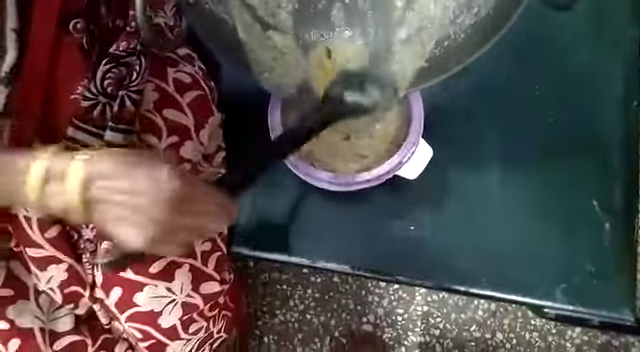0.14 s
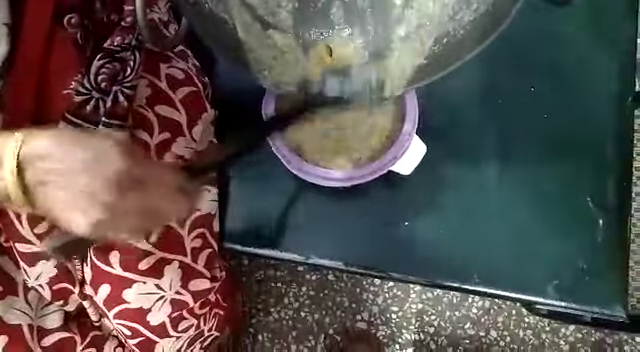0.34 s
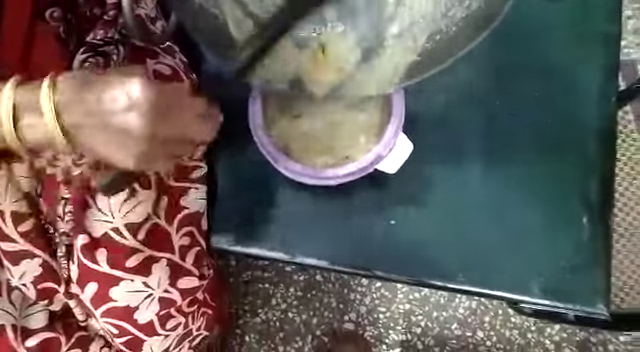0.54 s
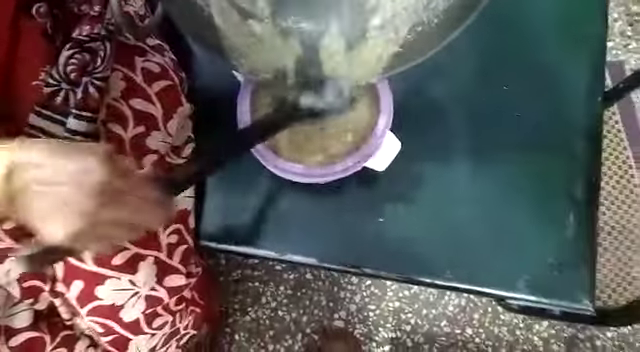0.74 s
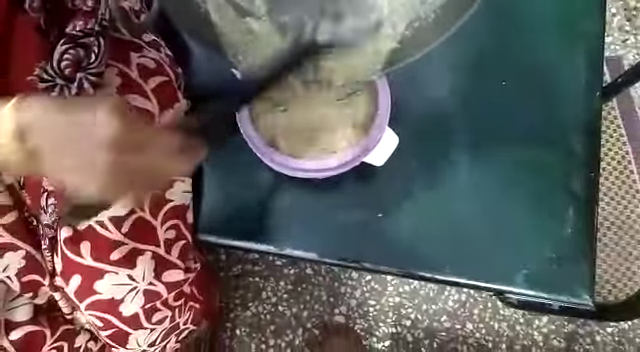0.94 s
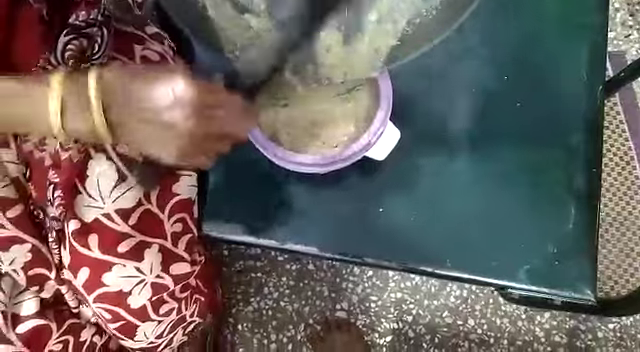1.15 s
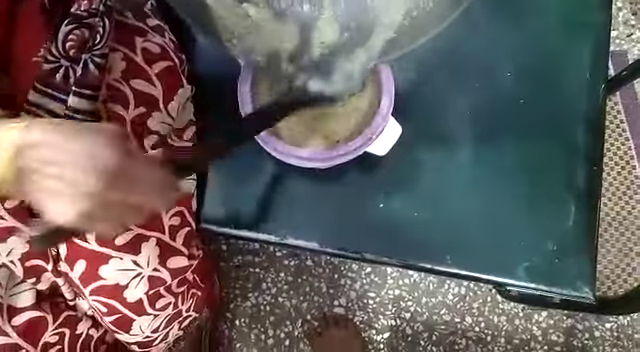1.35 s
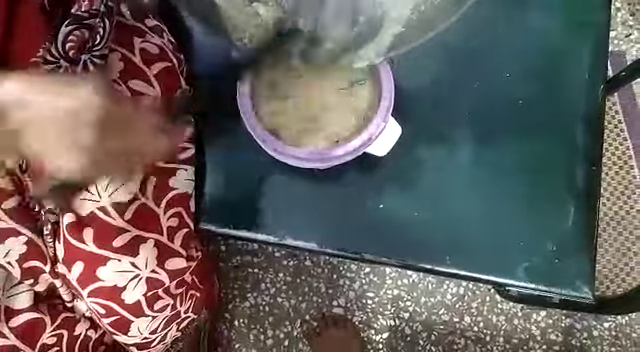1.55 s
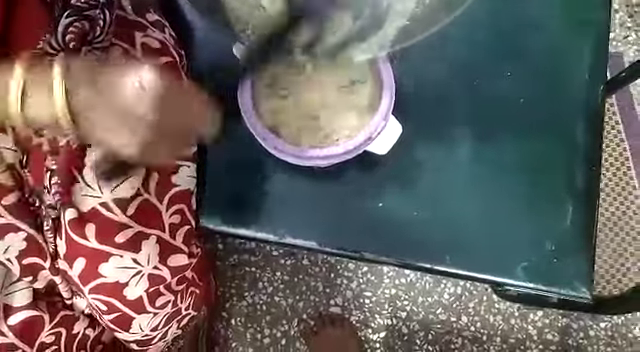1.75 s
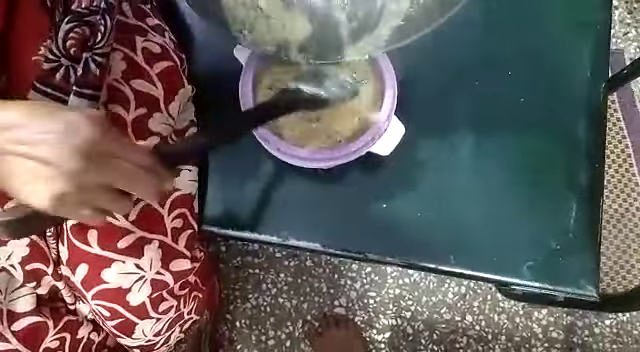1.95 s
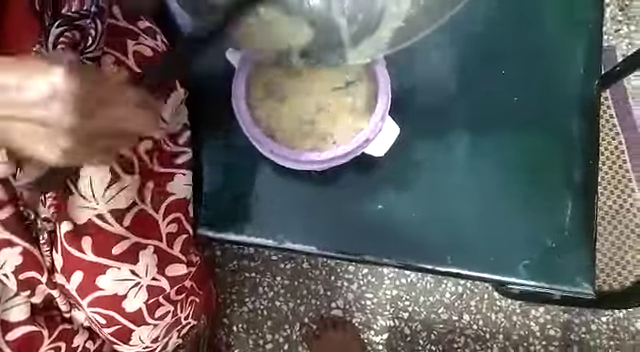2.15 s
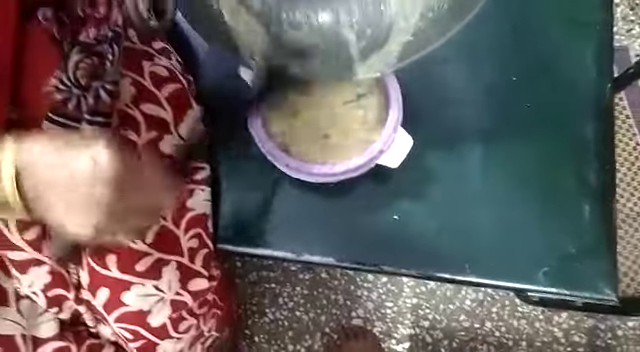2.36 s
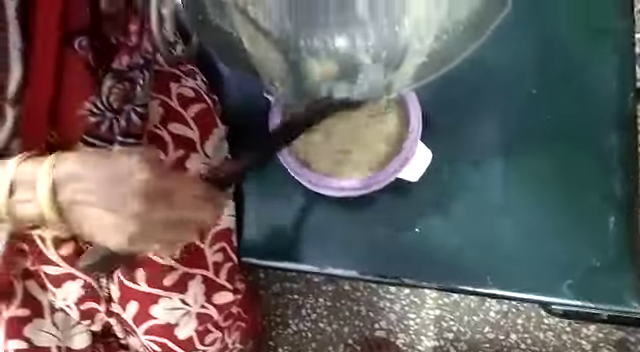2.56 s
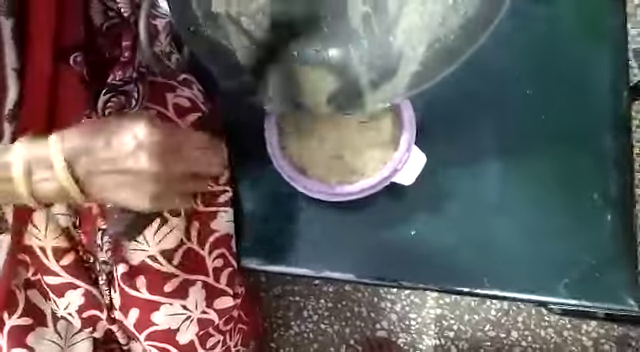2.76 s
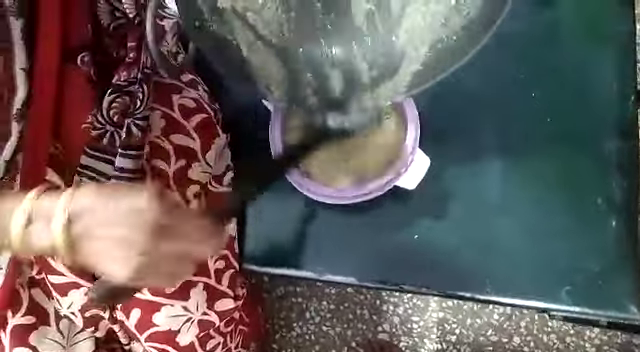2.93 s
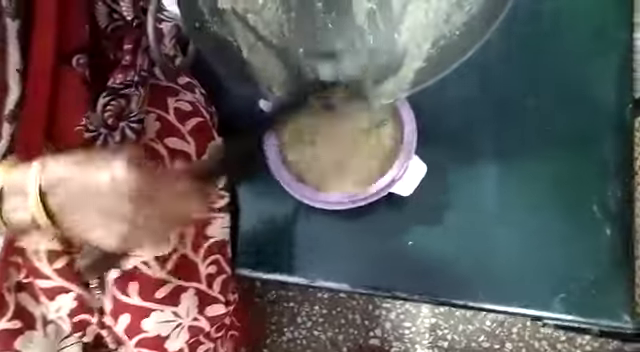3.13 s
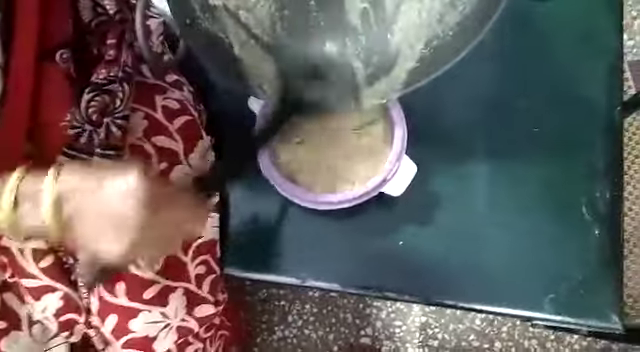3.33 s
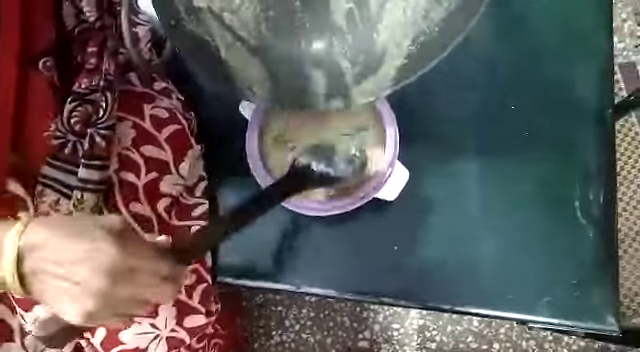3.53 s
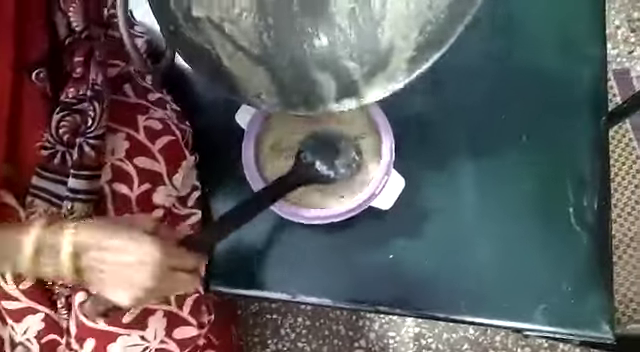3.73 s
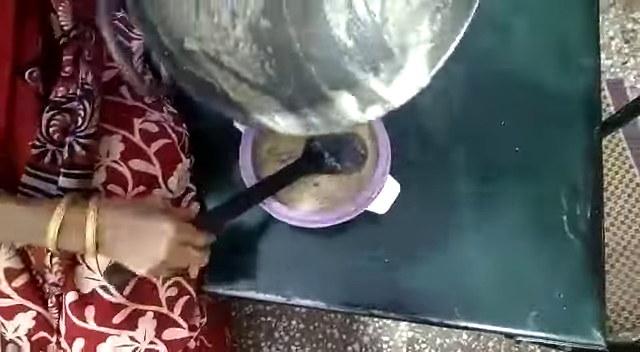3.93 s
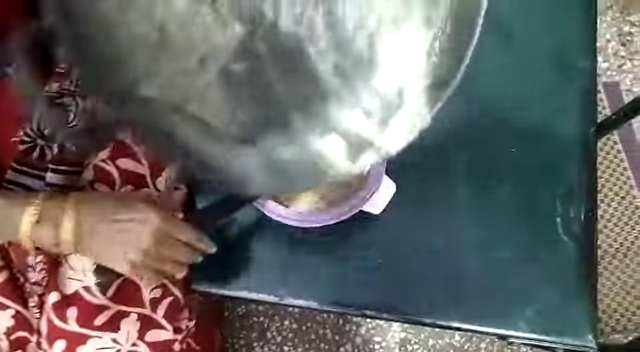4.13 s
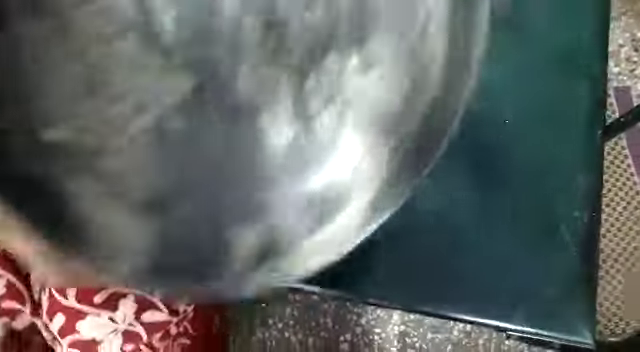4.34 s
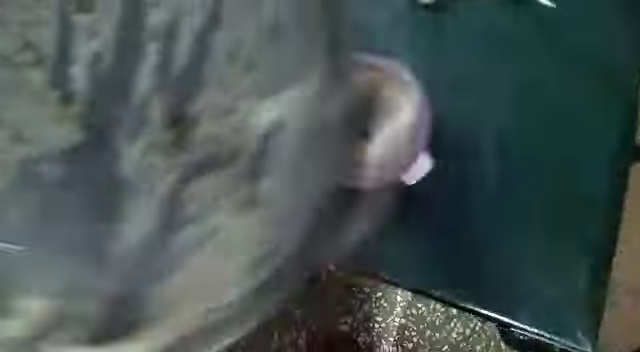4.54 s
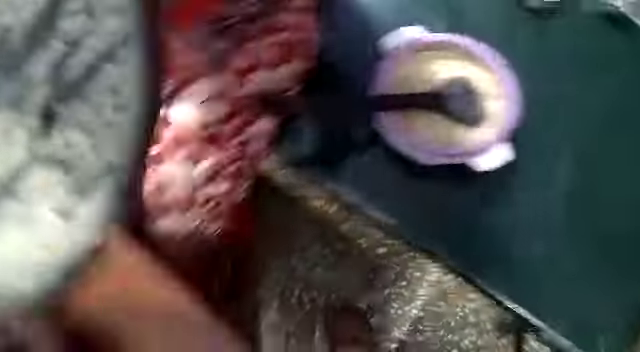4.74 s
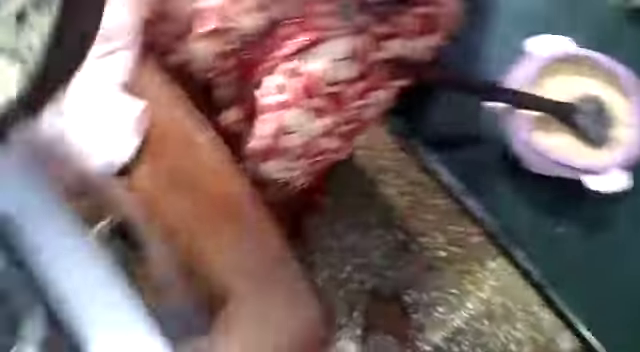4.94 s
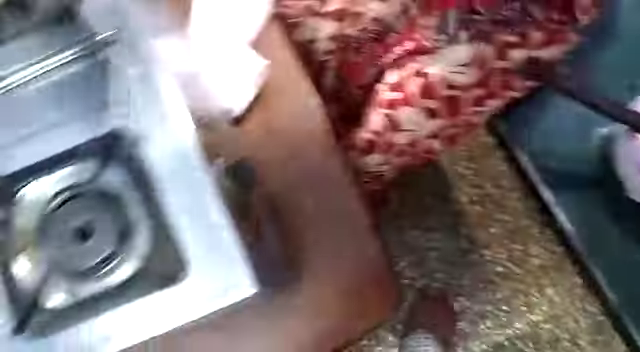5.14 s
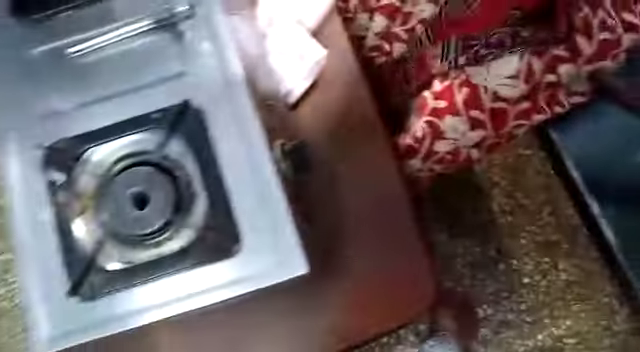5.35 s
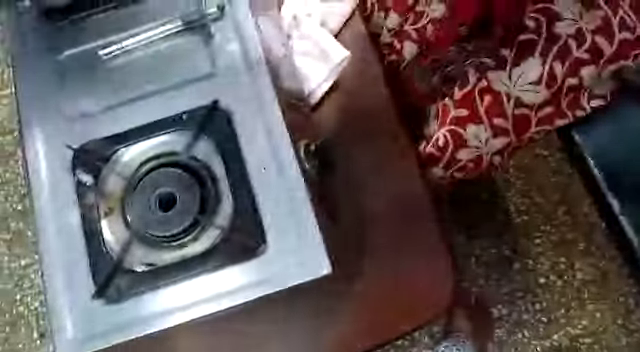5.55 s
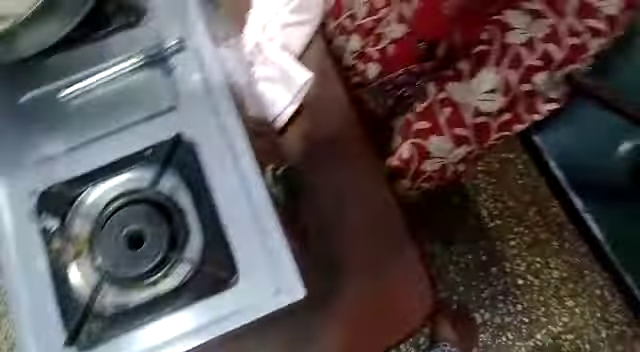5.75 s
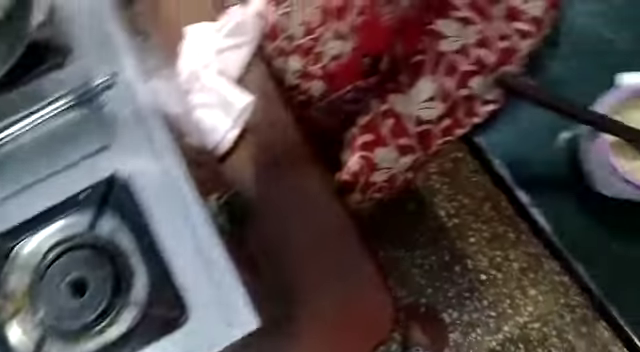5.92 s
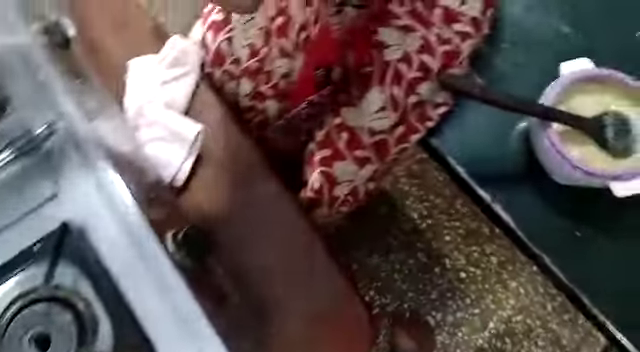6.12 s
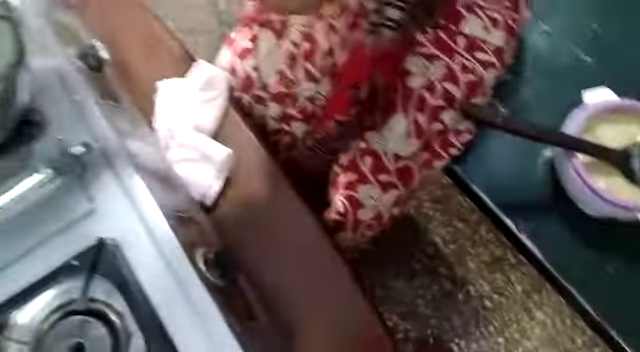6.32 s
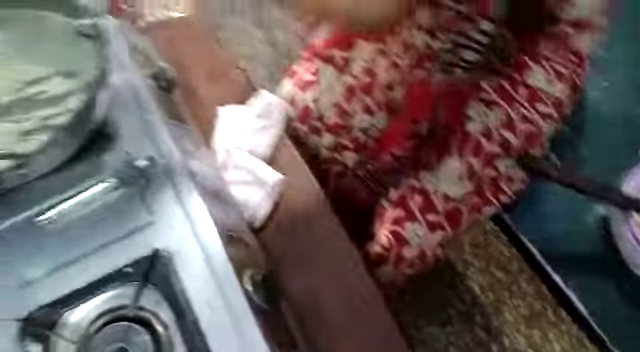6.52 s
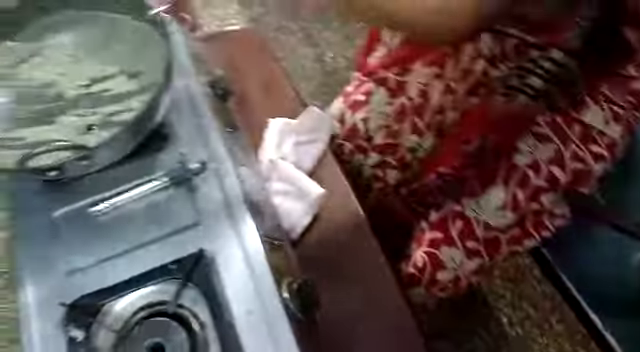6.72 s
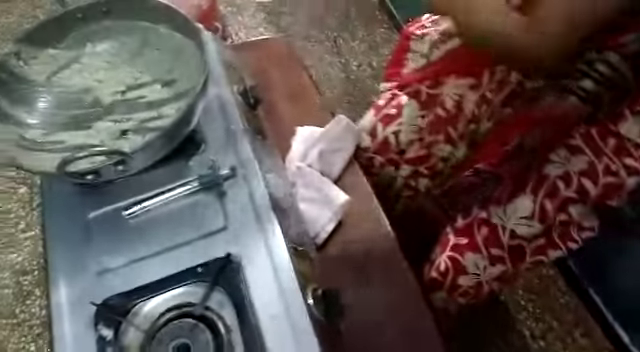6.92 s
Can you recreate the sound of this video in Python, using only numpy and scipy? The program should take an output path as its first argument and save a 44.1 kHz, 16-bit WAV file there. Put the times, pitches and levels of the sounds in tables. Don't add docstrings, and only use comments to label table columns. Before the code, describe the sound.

A metal ladle bangs and scrapes thick curry down a hand-held pan, then the pan clatters and grinds onto a stove grate.

```python
import sys
import numpy as np
from scipy import signal
from scipy.fft import rfft, irfft, next_fast_len
from scipy.io import wavfile
from scipy.ndimage import uniform_filter1d

SR = 44100
rng = np.random.default_rng(int(sys.argv[2]) if len(sys.argv) > 2 else 0)


def store_wav(level_fs):
    pcm = np.round(np.clip(np.atleast_2d(level_fs), -1, 1) * 32767)
    wavfile.write(sys.argv[1], SR, pcm.T.astype(np.int16))


def boost_factor(decibels):
    exponent = np.asarray(decibels, float) / 20
    return 10 ** exponent


N = 307818
TIME = np.arange(N) / SR


def unit(x):
    return x / np.sqrt(np.mean(x ** 2))


def over_hz(table, n):
    hz, value = np.transpose(table)
    bin_hz = np.arange(n // 2 + 1) * SR / n
    return np.interp(np.log(bin_hz + 1), np.log(hz), value)


def colour(x, table):
    n = next_fast_len(x.shape[-1])
    return irfft(rfft(x, n) * boost_factor(over_hz(table, n)), n)[..., :x.shape[-1]]


def bands(x, edges):
    def cut(hz, kind):
        return signal.sosfilt(signal.butter(4, hz, kind, fs=SR, output="sos"), x)

    middle = [cut(pair, "band") for pair in zip(edges, edges[1:])]
    return [cut(edges[0], "low")] + middle + [cut(edges[-1], "high")]


def walk(rate):
    k = int(SR / rate)
    held = np.repeat(rng.standard_normal(N // k + 1), k)
    return 2 * np.tanh(0.26 * uniform_filter1d(held, k)[:N])


def wobble(count, n, smooth_s):
    k = int(smooth_s * SR)
    return np.sqrt(k) * uniform_filter1d(rng.standard_normal((count, n)), k)


def ring(t, hz, t60):
    return np.sin(2 * np.pi * hz * t) * np.exp(-np.log(1000) * t / t60)


def add(out, s, db, sound):
    i = int((s - .001) * SR)
    out[:, i:i + sound.shape[1]] += boost_factor(db) * sound[:, :N - i] / np.abs(sound).max(1, keepdims=True)


CONTACT_EDGES = [1230, 3200, 4800]


def strikes(events, modes, grit, clank_t60, ring_t60, ring_db, crack_db, crack_s, tick_db):
    out, t = np.zeros((2, N)), np.arange(SR // 4) / SR
    hz, _, db = np.transpose(modes)
    choked = ring(t, hz[:, None], clank_t60)
    free = boost_factor(ring_db) * ring(t, hz[:, None], ring_t60)
    for s, peak_db, edge_db, low_hz, high_hz in events:
        mode_gain = boost_factor(db + 7.1 * rng.standard_normal((2, len(hz)))) * rng.choice([-1, 1], (2, len(hz)))
        body = mode_gain @ (choked + free * (0.33 + wobble(len(hz), len(t), 0.013)))
        favoured = 0.22 * ring(t, low_hz, 2.04 * clank_t60) + 0.44 * ring(t, high_hz, clank_t60)
        body = body / np.abs(body).max() + favoured
        crack = unit(colour(rng.standard_normal((2, len(t))), grit)) * np.exp(-t / crack_s)
        contact = 1 - np.exp(-t / 0.0022)
        blow = (body + boost_factor(crack_db) * crack) * contact
        for part, rel_db in zip(bands(blow, CONTACT_EDGES)[1:], (0, edge_db, edge_db + tick_db)):
            add(out, s, peak_db + rel_db, part)
    return out


def played(parts, pushes, fades, flutter_db, flutter_rate, hiss_db=0):
    build_db, lift_s, lift_db_per_s = 16, 6.728, 281
    out, catch, t = 0, walk(flutter_rate), TIME[::32]
    s, build_s, db, weight_db, sharp_db = np.transpose(pushes)[:, :, None]
    lifted_db = lift_db_per_s * np.clip(t - lift_s, 0, None) * (s < lift_s)
    for part, rel_db, fade in zip(parts, (weight_db, 0, sharp_db, sharp_db + hiss_db), fades):
        shape_db = np.where(t < s, build_db * (t - s) / build_s, fade * (s - t)) - lifted_db
        power = np.sum(boost_factor(2 * (db + rel_db + shape_db)), axis=0)
        gain = np.interp(TIME, t, np.sqrt(power))
        part = part / np.sqrt(uniform_filter1d(part ** 2, size=2000) + 1e-12)
        out = out + part * gain * boost_factor(flutter_db * (catch + 2.0 * walk(flutter_rate)))
    return out


def friction(pushes, fades, hiss_db, modes, grit, scatter_db, mode_db, wander_db, flutter_db):
    slips_per_s = 3000
    slip = (rng.random((2, N)) < slips_per_s / SR) * rng.choice([-1, 1], (2, N))
    slip = slip * boost_factor(scatter_db * rng.exponential(size=(2, N)))
    metal = 0
    for hz, width, db in modes:
        pole = np.exp(-np.pi * .6 * width / SR)
        rung = signal.lfilter([1, 0, -1], [1, -2 * pole * np.cos(2 * np.pi * hz / SR), pole ** 2], slip)
        metal = metal + rng.choice([-1, 1]) * (1 - pole) * boost_factor(db + wander_db * walk(14)) * rung
    sound = unit(colour(slip, grit)) + boost_factor(mode_db) * unit(metal)
    return played(bands(sound, CONTACT_EDGES), pushes, fades, flutter_db, flutter_rate=45, hiss_db=hiss_db)


def pings(events, db):
    out, t = np.zeros((2, N)), np.arange(SR // 3) / SR
    for s, peak_db, hz, t60 in events:
        pair = ring(t, hz, t60) + 0.19 * ring(t, 1.03 * hz, t60)
        add(out, s, peak_db + db, np.tile(pair * (1 - np.exp(-t / 0.00092)), (2, 1)))
    return out


def same_t60(events, t60):
    return [tuple(row) + (t60,) for row in events]


# frequency in Hz, level in dB.
AIR_COLOUR = [(15, -51), (30, -46), (60, -15), (100, -11.5), (293, -2), (335, -4.5), (372, -13.5),
              (403, -9), (461, -10.5), (587, -14), (924, -15), (1540, -22.5), (3920, -24.5), (5550, -34),
              (13800, -35), (14900, -58)]


def air():
    hum = unit(colour(rng.standard_normal((2, N)), AIR_COLOUR))
    parts = bands(hum, [150, 500, 1500, 4800])
    return boost_factor(-58.5) * sum(part * boost_factor(walk(3.12)) for part in parts)


# peak in seconds, clank in dB, sharpness in dB, low and high ring in Hz.
LADLE_BLOWS = [(0.0084, -15, -11, 1770, 2770), (0.5692, -11.5, -7.5, 1383, 2705),
               (0.6502, -38.5, 8, 1320, 3160), (1.1724, -13, -6, 1830, 2400),
               (1.7165, -14.5, -7, 1810, 2516), (1.755, -40, -20, 1810, 2490),
               (2.0674, -35, 15, 2050, 2800), (2.2685, -33, 3.5, 1400, 3240), (2.3282, -33, -9, 2190, 2410),
               (2.7775, -18, -0.5, 1906, 2490), (3.3119, -17.5, 4, 2490, 2190),
               (3.919, -47, -18, 1840, 2570)]
# frequency in Hz, width in Hz, level in dB.
PAN_MODES = [(297, 8, -19), (436.2, 18, -3), (488, 19, -5), (607, 15, -21), (847, 41, -16), (1390, 30, -22),
             (1810, 15, -18.5), (2272, 30, -13), (2490, 23, -10), (2612, 215, -13.5), (2980, 21, -14.5),
             (3750, 110, -12), (3980, 110, -10.5), (4353, 55, -21.5)]
# frequency in Hz, level in dB.
PAN_SCRAPE = [(35, -84), (60, -56), (240, -8), (269, -0.5), (331, -8), (479, -2), (1050, -26.5),
              (1830, -14.5), (3910, -17.5), (5280, -26), (8380, -25), (12100, -37.5), (14900, -59)]


def blows():
    return strikes(LADLE_BLOWS, PAN_MODES, PAN_SCRAPE, clank_t60=0.026, ring_t60=0.068, ring_db=-5.5,
                   crack_db=1.5, crack_s=0.0027, tick_db=-2.5)


# peak in seconds, level in dB, note in Hz, deep thump in relative dB.
BOWL_THUDS = [(0.008, -11, 421, -59), (0.569, -19, 406, -31), (0.648, -37.5, 456, -37),
              (1.169, -14.5, 433, -38), (1.7145, -13, 459, -54), (1.752, -30, 497, -45),
              (2.061, -28, 717, -47), (2.263, -36.5, 415, -16), (2.328, -30.5, 405, -42),
              (2.774, -42, 460, -18), (2.847, -40, 400, -30), (3.311, -16.5, 463, -55),
              (3.917, -38, 588, -11.5), (5.593, -16, 448, -57), (5.599, -23, 626, -47),
              (5.643, -31, 724, -41), (5.754, -32, 740, -36), (6.188, -30, 555, -48),
              (6.228, -29.5, 410, -35), (6.599, -56, 810, -15), (6.762, -41, 390, -12)]


def thuds():
    out, t = np.zeros((2, N)), np.arange(SR // 4) / SR
    trail_hz, trail_db = np.array([[280], [440], [485], [615]]), np.array([-8.0, -4.0, 1.5, -3.5])
    for s, db, hz, deep_db in BOWL_THUDS:
        push = rng.standard_normal((2, len(t))) * np.exp(-t / 0.0048)
        trail_gain = boost_factor(trail_db + 2.7 * rng.standard_normal((2, 4)))
        trail = trail_gain @ (ring(t, trail_hz, 0.45) * (.5 + wobble(4, len(t), 0.019)))
        note = ring(t, hz, 0.038) - 0.5 * ring(t, 1.98 * hz, 0.014)
        boom = note + 1.62 * bands(push, [1250])[0] + 0.079 * trail
        boom = boom * (1 - np.exp(-t / 0.00054)) ** 2
        add(out, s + 0.002336, db, bands(boom, [140])[1])
        thump = rng.standard_normal((2, len(t))) * t * np.exp(-t / 0.017)
        add(out, s, db + deep_db, bands(thump, [80, 150])[1])
    return out


# hardest at, in seconds, build-up in seconds, level in dB,
# weight on the bowl in dB, sharpness in dB.
LADLE_DRAGS = [(0.03, 0.023, -35, 3, -18), (0.08, 0.069, -42.5, 4, -4), (0.29, 0.03, -58, 6.5, -3),
               (0.6, 0.022, -39.5, -3, -5), (0.665, 0.053, -40, -3, 0), (0.73, .03, -58, 5, -14),
               (0.86, 0.088, -59, 1.5, -3), (1.2, 0.014, -34, 0.5, -5), (1.26, 0.056, -52.5, -2, 8),
               (1.33, 0.086, -48.5, -0.5, -4), (1.74, 0.0071, -35.5, 2, -26), (1.81, 0.067, -39.5, 6, -0.5),
               (1.885, 0.092, -42.5, -1, -11), (2.078, .008, -41, 3, 4.5), (2.15, 0.046, -53, -2, 1),
               (2.29, 0.018, -55.5, 2, 5.5), (2.35, 0.028, -42.5, -1, 0.5),
               (2.405, 0.092, -42.5, -5.5, -4.5), (2.8, 0.013, -49, -24, 4.5),
               (2.856, 0.014, -36.5, -8.5, 1.5), (2.91, 0.059, -42, -5, -5.5),
               (3.33, 0.015, -33, 7.5, -0.5), (3.38, 0.043, -36.5, 6, -2), (3.43, 0.045, -61, 1.5, -11)]
DRAG_FADES = (128.6, 177, 192, 161)


def drags():
    return friction(LADLE_DRAGS, DRAG_FADES, -0.5, PAN_MODES, PAN_SCRAPE,
                    scatter_db=2.0, mode_db=2.5, wander_db=9.0, flutter_db=2.0)


# start in seconds, end in seconds, frequency in Hz, level in dB.
RUBBED_MODES = [(0.012, 0.076, 1400, -60), (1.197, 1.27, 3300, -50), (1.735, 1.79, 1820, -41),
                (1.827, 1.905, 3200, -56), (1.861, 1.909, 1100, -52), (3.33, 3.463, 2600, -45.5),
                (3.388, 3.463, 1800, -48.5), (3.36, 3.41, 3980, -54), (5.78, 5.83, 2600, -43),
                (5.69, 5.715, 2200, -45), (6.612, 6.671, 1500, -48), (6.68, 6.765, 2880, -41),
                (6.69, 6.761, 1550, -49), (6.78, 6.86, 2450, -34), (2.776, 2.831, 1390, -54),
                (2.09, 2.17, 900, -51.5), (2.071, 2.15, 700, -49.5), (1.73, 1.86, 410, -45),
                (1.73, 1.84, 990, -57), (6.68, 6.745, 4000, -46)]


def sings():
    out = np.zeros((2, N))
    for start, end, hz, db in RUBBED_MODES:
        t = np.arange(int((end - start + 0.066) * SR)) / SR
        swell_db = np.interp(t, [0, .015, end - start, t[-1]], [-11, -5.0, -14, -43])
        beating = 0.49 + wobble(2, len(t), .005)
        add(out, start, db + 11.5, beating * np.sin(2 * np.pi * hz * t) * boost_factor(swell_db))
    return out


# peak in seconds, level in dB, frequency in Hz.
EDGE_CATCHES = [(0.019, -32, 1390), (0.019, -39, 1870), (0.02, -23, 2500), (0.0439, -39, 2505),
                (0.0519, -40, 2583), (0.65, -45, 3170), (0.6605, -41, 4370), (1.203, -35, 2430),
                (1.2122, -36, 3680), (1.2192, -42, 2540), (1.2254, -39, 1851), (1.2282, -40, 2250),
                (1.324, -38.5, 2368), (2.3307, -39, 3730), (2.335, -37, 2497), (2.8515, -38, 4400),
                (2.8525, -33, 3750), (2.8695, -40, 2520), (2.8725, -37, 3770), (2.877, -37, 4340),
                (3.3384, -38, 4020), (3.3394, -43, 4400), (3.3397, -33, 1044), (3.3446, -36, 2497),
                (3.353, -39, 2497), (3.3655, -39, 3980), (3.3673, -39, 2497), (3.3753, -43, 3970),
                (3.38, -41, 2570), (3.3906, -40, 1260), (3.3937, -37, 2510), (3.4073, -36, 2454),
                (3.4102, -43, 1410), (3.4216, -36.5, 1840), (3.4263, -38, 2450), (3.436, -37, 2490)]


def catches():
    return pings(same_t60(EDGE_CATCHES, 0.048), 1)


# peak in seconds, level in dB, bright part in relative dB, bangle in Hz.
BANGLE_TICKS = [(0.154, -55, -1, 2440), (0.285, -51, 0, 2560), (0.311, -53, 1.5, 2030),
                (0.361, -65.5, 12.5, 2580), (0.826, -48.5, -6, 2580), (0.8594, -54.5, 2.5, 2880),
                (1.1113, -54, -1, 4050), (1.4804, -50, -5, 4050), (2.551, -51.5, -0.5, 2300),
                (3.632, -58, 3.5, 4500), (3.785, -56.5, 1, 2360), (3.982, -55.5, 7.5, 2560),
                (4.024, -46.5, -5.5, 3240), (4.071, -49, -22, 3200), (4.1028, -49, -2, 3240),
                (4.322, -50.5, -8, 2360), (4.3834, -55.5, 5, 2650)]


def ticks():
    out, t = np.zeros((2, N)), np.arange(SR // 12) / SR
    for s, db, bright_db, hz in BANGLE_TICKS:
        click = rng.standard_normal((2, len(t))) * np.exp(-t / 0.0032)
        _, dull, bright, _ = bands(click, [2000, 5000, 11000])
        add(out, s, db, dull + 0.52 * ring(t, hz, 0.076))
        add(out, s, db + bright_db + 5, bright)
    return out


# peak in seconds, level in dB, frequency in Hz, T60 in seconds.
WOKEN_MODES = [(0.569, -22, 2670, 0.038), (0.569, -21.5, 2265, 0.034), (0.569, -24, 1960, 0.028),
               (0.569, -21.5, 4200, 0.016), (0.569, -29.5, 205, .03), (0.66, -40, 450, .1),
               (1.78, -33, 480, .25), (1.172, -24.5, 2206, 0.085), (1.172, -22.5, 2466, 0.12),
               (1.172, -28.5, 795, .025), (1.172, -37, 172, .04), (1.717, -20, 2900, 0.036),
               (1.717, -25, 2480, 0.063), (1.755, -27, 595, 0.054), (1.83, -34, 2070, 0.05),
               (1.868, -32.5, 2400, .04), (1.882, -38, 1400, 0.043), (1.884, -34, 1910, 0.053),
               (1.888, -41, 2640, .03), (2.062, -39, 3600, .012), (2.069, -41, 2720, .04),
               (2.08, -35, 2600, .04), (2.776, -29, 1420, 0.12), (2.776, -29, 12000, 0.0079),
               (3.3125, -25, 1086, 0.034), (1.7175, -23.5, 310, 0.034), (3.33, -28, 470, 0.28),
               (3.37, -30.5, 497, 0.42), (6.151, -44, 2300, .02), (6.762, -46, 70, 0.046),
               (6.777, -20, 8640, 0.034), (6.778, -20.5, 3994, 0.055), (6.765, -32, 4540, 0.042),
               (6.815, -37, 3880, 0.19), (1.717, -16.5, 1830, 0.061), (2.864, -42, 380, .02),
               (2.268, -28.5, 2480, 0.022), (2.268, -33.5, 3750, .04), (3.925, -45.5, 200, 0.073),
               (3.945, -53, 620, .08), (2.849, -33.5, 367, 0.017), (6.738, -31, 8050, 0.022),
               (6.696, -40, 8800, .02), (6.79, -36, 8550, 0.3), (6.724, -27, 4250, 0.033),
               (2.385, -44, 1400, 0.18)]


def woken():
    return pings(WOKEN_MODES, 0)


# fullest at, in seconds, build-up in seconds, level in dB,
# low shuffle in dB, silky hiss in dB.
TURNS = [
    (1.5, 0.47, -64, -6, 1),
    (3.79, 0.059, -68.5, 2, -2),
    (3.95, 0.098, -62, 5, -3.5),
    (4.04, .05, -63.5, -17, -2),
    (4.39, 0.036, -57.5, -12, -3.5),
    (4.72, 0.53, -62, -1, 2.5),
    (5.1, 1, -73, 14, -13),
    (5.4, 0.86, -63.5, -22, -1),
    (5.568, 0.19, -60, 7, -10),
]
# frequency in Hz, level in dB.
CLOTH_COLOUR = [(24, -59.5), (40, -51), (105, -12), (191, -27.5), (216, -18), (290, -8), (782, -17.5),
                (1080, -28), (2390, -6), (5020, -23.5), (9090, -16), (13900, -32), (14900, -43)]
CLOTH_FADES = (38, 43, 49)


def rustle():
    fibres = rng.standard_normal((2, N)) * boost_factor(1.5 * rng.exponential(size=(2, N)))
    parts = bands(colour(fibres, CLOTH_COLOUR), [1100, 4800])
    return played(parts, TURNS, CLOTH_FADES, flutter_db=.6, flutter_rate=25)


# peak in seconds, level in dB, frequency in Hz, T60 in seconds.
WALL_DENTS = [
    (1.7162, -14.5, 580, 0.0064),
    (3.3128, -10, 596, 0.0061),
    (3.3128, -21.5, 770, 0.011),
]


def dents():
    return -bands(pings(WALL_DENTS, 0), [45])[1]


# peak in seconds, level in dB, frequency
# in Hz, T60 in seconds.
RINGING_TAILS = [
    (5.757, -34, 760, 0.22),
    (5.84, -39, 690, .5),
    (5.77, -36, 2660, 0.38),
    (5.8, -39.5, 1450, 0.24),
    (5.862, -42, 290, .2),
    (6.777, -39.5, 400, .2),
    (3.94, -55, 105, .9),
]


def tails():
    return pings(RINGING_TAILS, 0)


# peak in seconds, clank in dB, sharpness in dB, low and high ring in Hz.
PAN_LANDINGS = [(5.5945, -14.5, 2, 2880, 4070), (5.6064, -18.5, -7, 1400, 4660),
                (5.6142, -20, -24, 1392, 4470), (5.6444, -43, 3, 2490, 2940),
                (5.7229, -35.5, 7, 2450, 3700), (6.1515, -36, -8, 2320, 3980),
                (6.1738, -20, -3, 2930, 3640), (6.1868, -18, -2.5, 2010, 2820),
                (6.2285, -21.5, -5, 2260, 3600), (6.276, -24, -4.5, 2600, 4330),
                (6.7648, -16, 1, 2620, 4360), (6.777, -16, 2, 2400, 3950)]
# frequency in Hz, width in Hz, level in dB.
GRATE_MODES = [(469, 99, -9.5), (683, 160, -16), (1066, 68, -13), (1400, 83, -15), (2100, 230, -17),
               (2400, 54, -2.5), (2600, 83, -3.5), (2794, 80, -8.5), (3670, 44, -11), (3957, 390, 0.5),
               (4410, 150, -7)]
# frequency in Hz, level in dB.
GRATE_SCRAPE = [(35, -53), (60, -37.5), (295, -3), (513, -9), (743, -2.5), (1210, -12), (2470, -6),
                (4000, -11.5), (5660, -7), (8770, -6.5), (12100, -21), (13900, -27), (14900, -57)]


def landings():
    return strikes(PAN_LANDINGS, GRATE_MODES, GRATE_SCRAPE, clank_t60=.03, ring_t60=.25, ring_db=-12,
                   crack_db=0, crack_s=.0035, tick_db=-0.5)


# peak in seconds, level in dB,
# frequency in Hz.
GRATE_BOUNCES = [(5.5963, -24, 3000), (5.5963, -24, 3570), (5.5963, -23.5, 2480), (5.5963, -33, 4150),
                 (5.6043, -31, 2980), (5.6082, -29, 4420), (5.6102, -22.5, 1960), (5.6102, -30, 2490),
                 (5.6232, -33, 4565), (5.6242, -28, 3080), (5.6252, -26, 2497), (5.6292, -27, 1400),
                 (5.6053, -20, 815), (5.6132, -20, 1033), (5.6382, -26, 740), (5.6462, -26, 732),
                 (5.6581, -29, 732), (5.6801, -32, 904), (5.725, -30, 3600), (5.735, -28, 3470),
                 (5.7546, -24.5, 3620), (5.7559, -27, 3060), (5.76, -27, 4300), (5.7639, -29.5, 760),
                 (5.7659, -27, 3220), (5.7699, -30, 2600), (5.775, -26, 3920),
                 (6.174, -35, 1070), (6.175, -29, 2200), (6.176, -36, 4521), (6.1869, -24, 3402),
                 (6.1874, -23, 4180), (6.1866, -22, 4720), (6.1869, -21, 2155), (6.1872, -20.5, 2940),
                 (6.2069, -31, 2310), (6.2285, -30, 2570), (6.2288, -27, 2170), (6.2358, -32, 3402),
                 (6.276, -28, 4340), (6.276, -28, 2145), (6.281, -32, 2627)]


def clatter():
    return pings(same_t60(GRATE_BOUNCES, 0.027), 2.5)


# hardest at, in seconds, build-up in seconds, level in dB,
# weight in dB, sharpness in dB.
BASE_GRINDS = [(5.605, 0.0064, -23, 1.5, 0.5), (5.69, 0.026, -32.5, -44, -15), (5.765, 0.09, -30, -8, -6.5),
               (5.96, 0.17, -54, 1.5, -3), (6.172, 0.038, -43, 1, 0.5), (6.2, 0.0048, -25.5, -9.5, -6.5),
               (6.3, 0.04, -38, -6, -13), (6.44, 0.44, -52, 2.5, 0.5), (6.58, 0.22, -47.5, 0.5, -1.5),
               (6.72, 0.1, -33.5, -9.5, 0), (6.79, 0.043, -31, -12, 1)]
GRIND_FADES = (98, 130, 123, 142)


def grinds():
    return friction(BASE_GRINDS, GRIND_FADES, 1.5, GRATE_MODES, GRATE_SCRAPE,
                    scatter_db=1.0, mode_db=0.5, wander_db=1.5, flutter_db=0.5)


# peak in seconds, level in dB, frequency in Hz, T60 in seconds.
PAN_ROCKING = [
    (6.688, -32, 2680, 0.028),
    (6.694, -26, 2850, 0.027),
    (6.7171, -23, 2900, 0.029),
    (6.7207, -19, 2900, 0.038),
    (6.7642, -16, 4380, 0.031),
    (6.7777, -10, 2835, 0.021),
]


def rocking():
    return pings(PAN_ROCKING, -11)


def kitchen(x):
    room_t60_s, room_db = 0.55, -15
    t = np.arange(SR // 2) / SR
    low, high = bands(rng.standard_normal((2, len(t))), [4000])
    tail = (low + high * np.exp(-t / 0.11)) * np.exp(-np.log(1000) * t / room_t60_s) * (t > .006)
    tail = tail / np.sqrt(np.sum(tail ** 2) / 2)
    return x + boost_factor(room_db) * signal.fftconvolve(x, tail, axes=1)[:, :N]


def scene():
    struck = blows() + landings() + thuds() + dents()
    rubbed = boost_factor(-3.0) * (drags() + grinds()) + sings() + catches()
    small = ticks() + woken() + tails() + clatter() + rocking()
    return kitchen(struck + rubbed + small) + rustle() + air()


# frequency in Hz, share of time missing.
TREBLE_GAPS = [(4700, 0), (4900, .24), (6800, .13), (8000, .04), (10000, .07), (11500, .2), (14000, .4),
               (14250, .97)]


def gapped(x, width=6, hold=3):
    z = signal.stft(x, nperseg=1024)[2]
    bins, frames = z.shape[1:]
    chance = rng.random((bins // width + 1, frames // hold + 1))
    chance = np.repeat(np.repeat(chance, width, 0), hold, 1)[:bins, :frames]
    power = np.sum(np.abs(z[:, 100:]) ** 2, axis=(0, 1))
    calm = power < 6 * np.roll(power, 1)
    after_attack = 1.5 * (power < np.roll(power, 3) / 3)
    missing = (chance < over_hz(TREBLE_GAPS, 1024)[:, None] * (1 + after_attack)) & calm
    return signal.istft(z * np.where(missing, boost_factor(-24), 1), nperseg=1024)[1][:, :N]


def low_pass(x):
    return signal.sosfilt(signal.butter(12, 15070, fs=SR, output="sos"), x)


# frequency in Hz, left minus right in dB.
PORT_COLOUR = [(60, 17), (110, 13), (200, 16.5), (370, 13), (690, 0), (1260, 3.5), (2320, 11), (4280, 7),
               (7870, 2.5), (14500, 8.5)]
# frequency in Hz, correlation.
PORT_CORRELATION = [(60, 0.5), (150, 0.89), (400, 0.99), (700, 0.36), (1400, 0.044), (3000, 0.014),
                    (14000, 0.015)]
# frequency in Hz, level in dB.
TREBLE_STEP = [(4750, -0.5), (4900, -2)]
# time in seconds, left minus right in dB.
PHONE_TURN = [
    (0.0, 5),
    (0.58, 5.5),
    (1.73, 4.5),
    (2.82, 5.5),
    (3.11, 3.5),
    (3.64, 3.5),
    (3.77, 4.5),
    (6.98, 5.5),
]


def record(dry):
    port_lag_s, top_hz, overload = 7e-5, 14800, .9
    n = next_fast_len(N)
    a, b = rfft(dry, n)
    like = np.clip(over_hz(PORT_CORRELATION, n), 0, 1)
    lean = boost_factor(over_hz(PORT_COLOUR, n))
    right = 2 * boost_factor(over_hz(TREBLE_STEP, n)) / np.sqrt(lean ** 2 + 1 + 2 * like * lean)
    lag = np.exp(-2j * np.pi * port_lag_s * np.arange(len(a)) * SR / n)
    left_port = lean * right * a * lag
    right_port = right * (like * a + np.sqrt(1 - like ** 2) * b)
    ports = irfft(np.array([left_port, right_port]), n)[:, :N]
    turn_db = np.interp(TIME, *np.transpose(PHONE_TURN)) - 6.5
    ports = ports * boost_factor(np.array([0.37 * turn_db, -.7 * turn_db]))
    ports = overload * np.tanh(ports / overload)
    ports = signal.sosfilt(signal.butter(10, top_hz, fs=SR, output="sos"), ports)
    return low_pass(gapped(ports))


dry = scene()
out = record(dry)
store_wav(out)
```